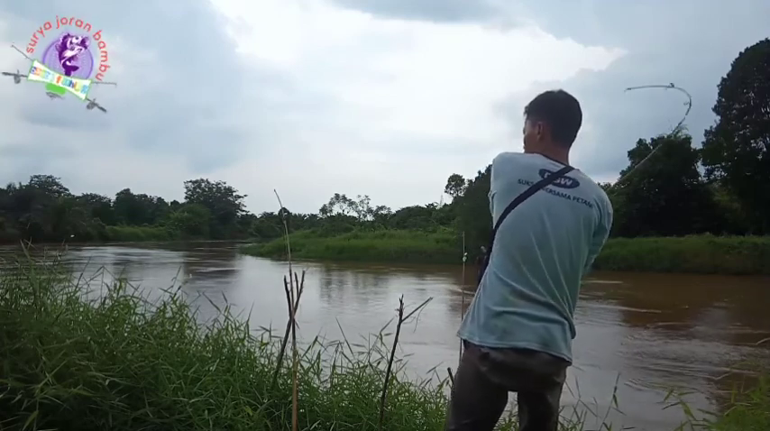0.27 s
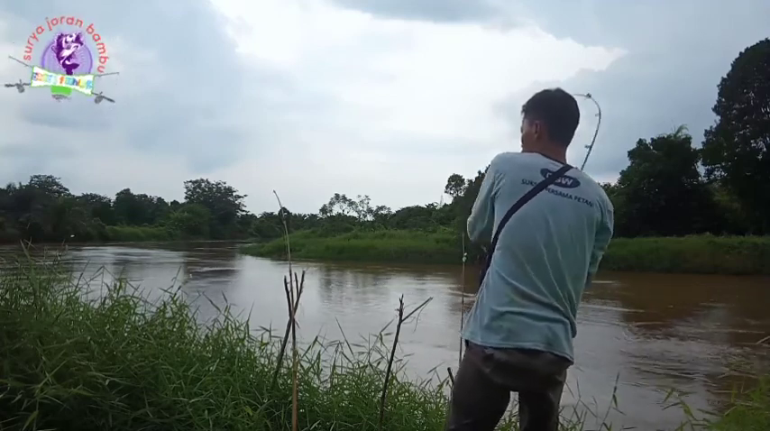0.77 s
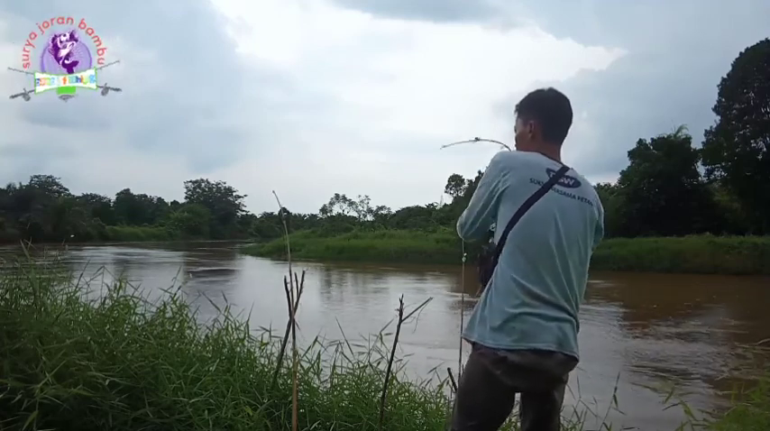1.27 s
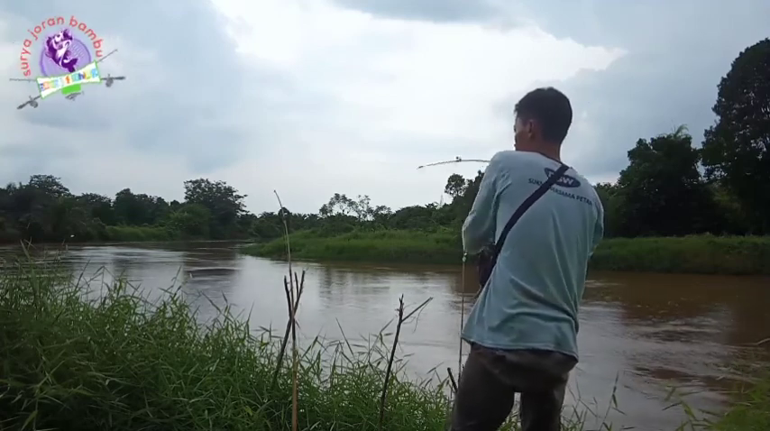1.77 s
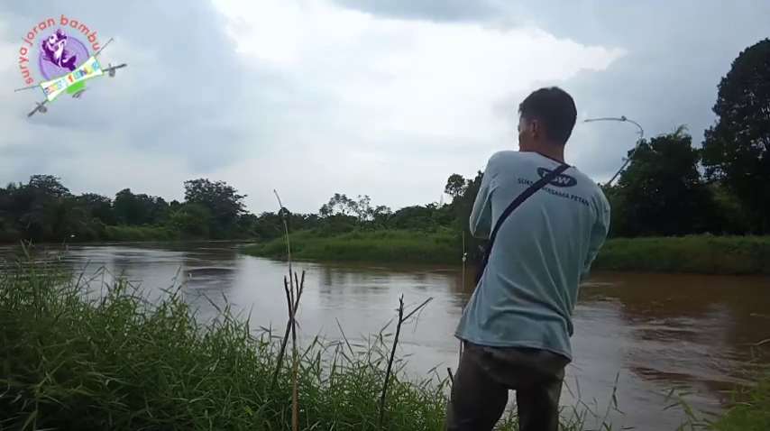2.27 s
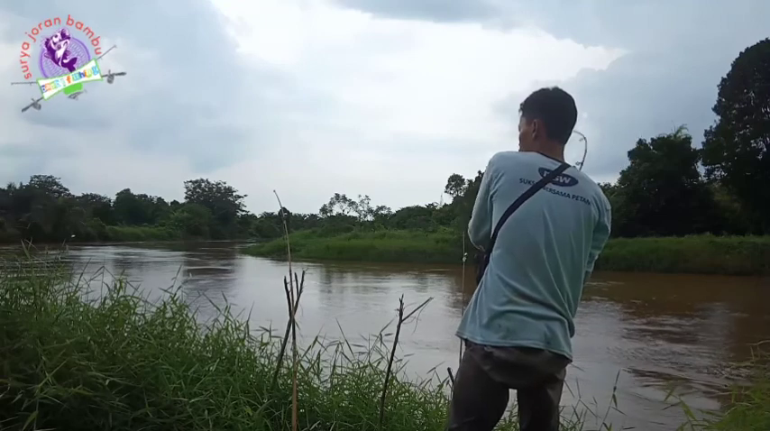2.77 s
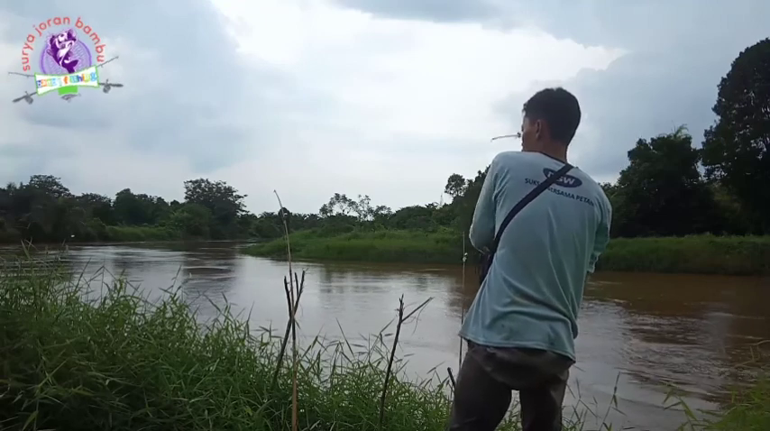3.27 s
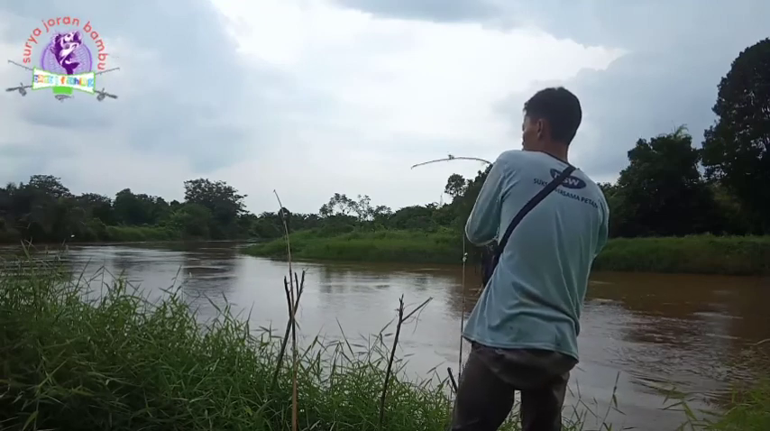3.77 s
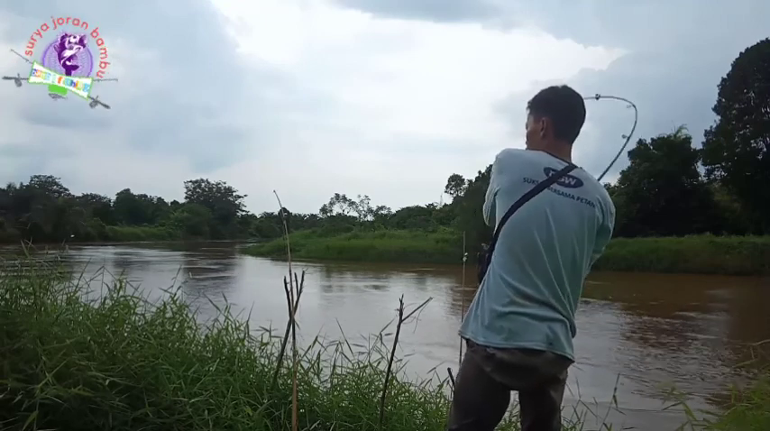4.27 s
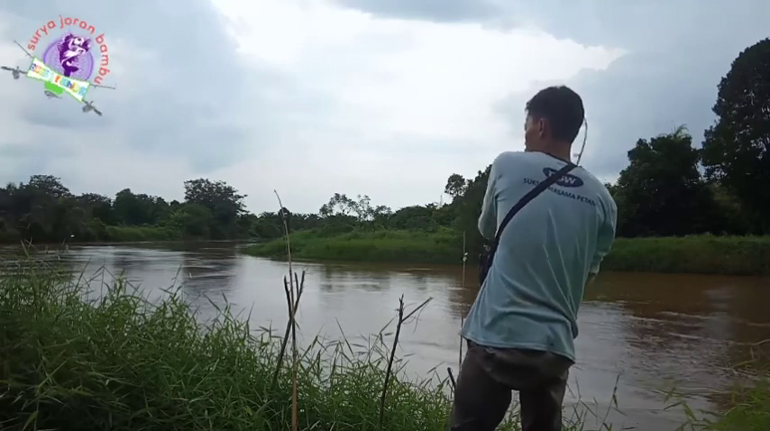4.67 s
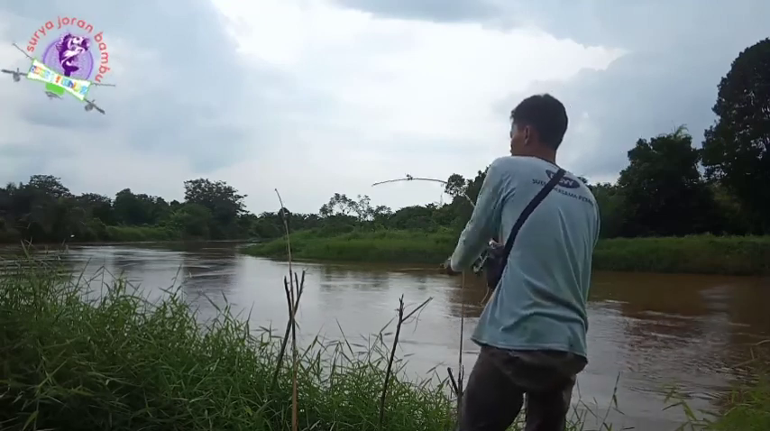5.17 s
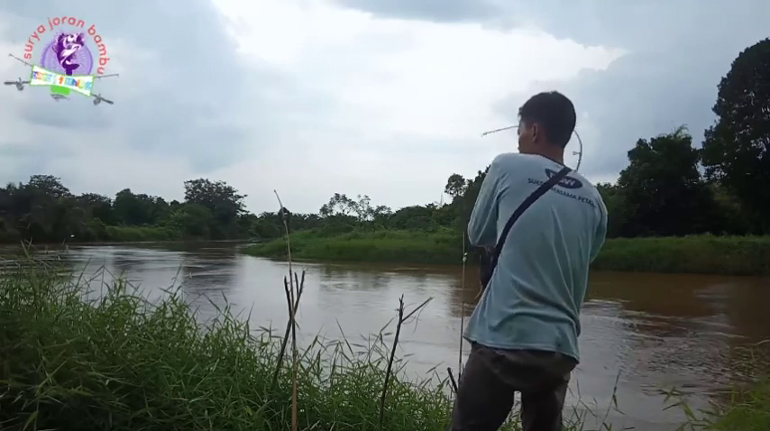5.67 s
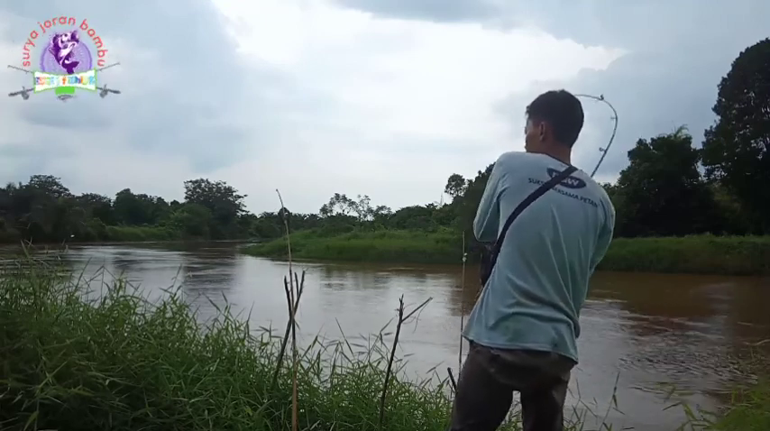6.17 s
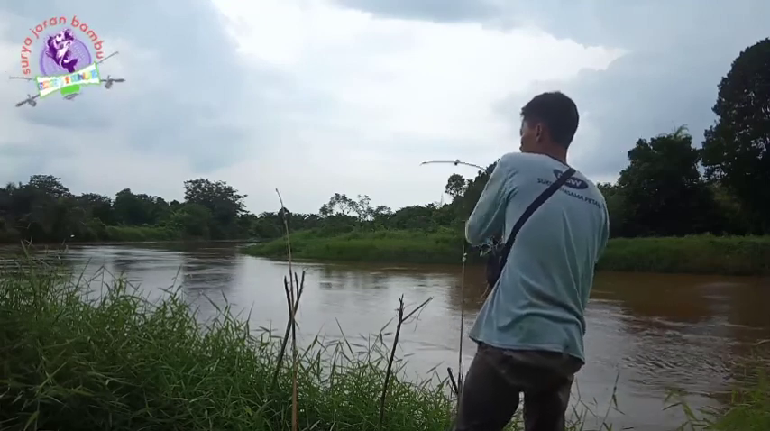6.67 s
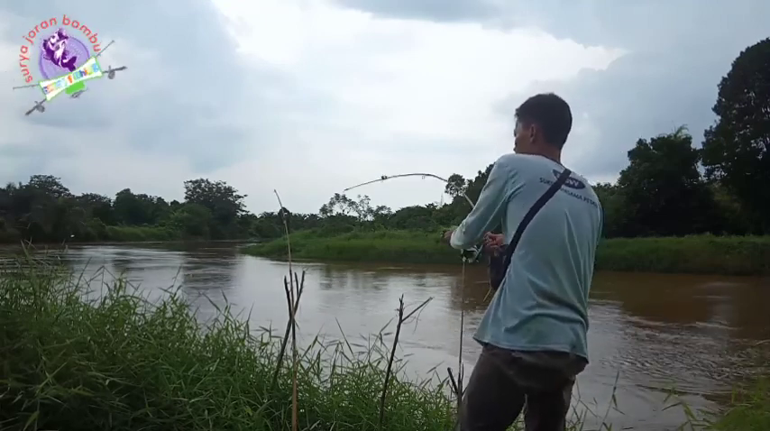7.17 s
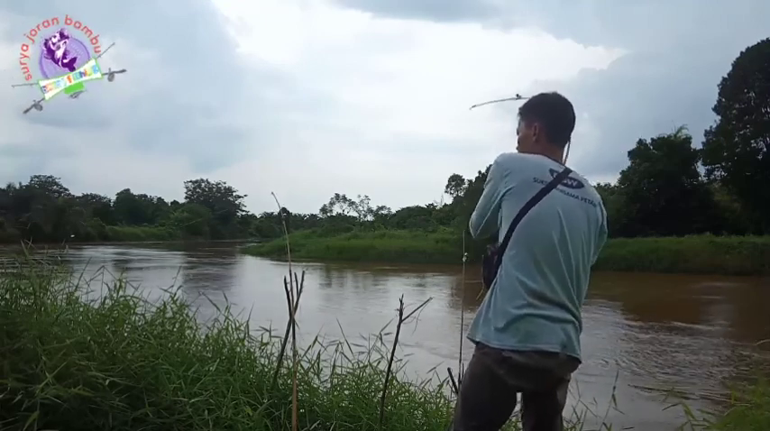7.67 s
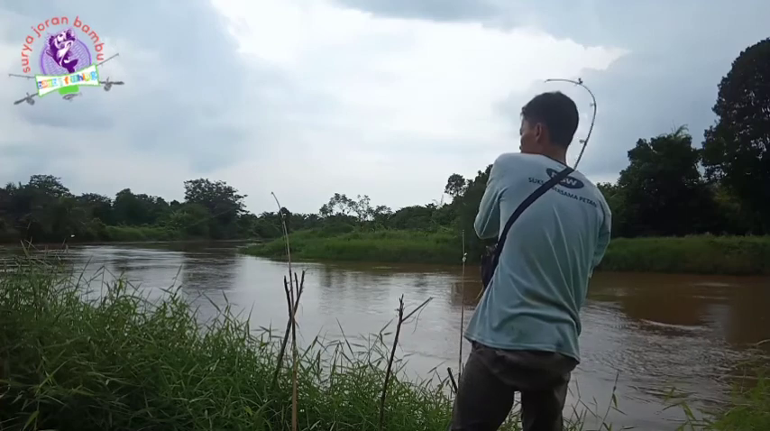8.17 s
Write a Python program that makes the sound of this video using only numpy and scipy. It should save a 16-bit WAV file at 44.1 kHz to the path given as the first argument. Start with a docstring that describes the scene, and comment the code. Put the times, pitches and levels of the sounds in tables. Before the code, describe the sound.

Two small bells on a fishing rod rattle with sharp ticks and short, bright rings. A reel is cranked in repeated bursts, its gears whirring softly and knocking, and each burst shakes the bells harder. In the pauses they jingle more lightly. Outdoors behind this nearby rattling, a river murmurs quietly under a thin high hiss, and three faint whistles pass, perhaps from a bird.

```python
"""Two small pellet bells rattle on a fishing rod: sharp ticks and a short, bright ring.
Each impact of a pellet excites the damped modes of its shell. The angler pumps the rod and cranks
the reel in bursts, shaking the bells; the gears whirr and the rotor knocks the resonant frame.
Behind them the river murmurs under a thin high hiss, the taut line sings faintly,
and three faint arched whistles pass, perhaps a bird."""
import sys
import numpy as np
from scipy import signal
from scipy.fft import rfft, irfft, next_fast_len
from scipy.io import wavfile

SR = 44100
rng = np.random.default_rng(int(sys.argv[2]) if len(sys.argv) > 2 else 0)


def wav_out(sig):
    """Save sig, one row per channel (or a flat mono array), as 16-bit PCM at SR to the path in sys.argv[1]."""
    wavfile.write(sys.argv[1], SR, np.round(np.clip(np.atleast_2d(sig).T, -1, 1) * 32767).astype(np.int16))


N = 370440
TIME_S = np.arange(N) / SR


def amp(db):
    """Amplitude ratio of a level in decibels."""
    return 10 ** (np.asarray(db) / 20)

def spectral_gain(spectrum, hz):
    """Spectral envelope: levels interpolated on a logarithmic frequency axis."""
    corner_hz, db = np.transpose(spectrum)
    return amp(np.interp(np.log(hz + 1), np.log(corner_hz), db))

def wobble(rate_hz):
    """Random modulation: straight lines between Gaussian values."""
    knots = rng.standard_normal(int(N * rate_hz / SR) + 2)
    return np.interp(TIME_S * rate_hz, np.arange(len(knots)), knots)

def filtered(x, response):
    """Linear filtering: the spectrum is multiplied by a frequency response."""
    size = next_fast_len(N + SR // 2)
    return irfft(rfft(x, size) * response(np.fft.rfftfreq(size, 1 / SR)), size)[..., :N]

def noise(spectrum):
    """Coloured noise: white noise under a spectral envelope, scaled to rms 1."""
    x = filtered(rng.standard_normal(N), lambda hz: spectral_gain(spectrum, hz))
    return x / np.sqrt(np.mean(x ** 2))

def resonate(x, modes):
    """Forced response of parallel second-order resonators of alternating polarity."""
    return filtered(x, lambda f: sum(
        (-1) ** k * amp(db) * 1j * f * width / (centre ** 2 - f ** 2 + 1j * f * width)
        for k, (centre, width, db) in enumerate(modes)))

def place(times, sounds):
    """Superposition of short sounds, one a row, at their start times."""
    at = np.round(times * SR).astype(int)[:, None] + np.arange(sounds.shape[1])
    return np.bincount(at.ravel(), sounds.ravel(), N)[:N]

def bursts(levels_db, t60_s, size=1024):
    """Decaying noise bursts, each with the energy of a single impulse of its level."""
    puff = rng.standard_normal((len(levels_db), size)) * amp(-60 * np.arange(size) / SR / t60_s)
    return puff * (amp(levels_db) / np.linalg.norm(puff, axis=1))[:, None]

def spells(rows, rise_s, fall_s):
    """Exponential build-up and decay of gain for rows of start_s, stop_s, level_db."""
    gain = np.zeros(N)
    for start, stop, db in rows:
        a, b = np.searchsorted(TIME_S, [start, stop + 8 * fall_s])
        t = TIME_S[a:b]
        gain[a:b] += amp(db) * (1 - np.exp((start - t) / rise_s)) * np.exp(np.minimum(stop - t, 0) / fall_s)
    return gain


# Spectra of the current and of the hiss: frequency_hz, relative_density_db
RIVER_SPECTRUM = [(15, -43), (25, -3), (119, 1), (166, 0.5), (251, -2), (285, -2.5), (323, -3.5), (726, -7),
                  (1380, -8.5), (1740, -10), (2800, -11), (3050, -5.5), (3600, -13.5), (4680, -36),
                  (7920, -120)]
HISS_SPECTRUM = [(2500, -26), (3600, -10.5), (5000, -12), (6900, 2), (8500, -9.5), (10000, -11),
                 (12000, -5), (13300, 5.5), (14500, -4.5), (15700, 5)]

def riverside():
    """Amplitude-modulated noise: the current murmurs under a flickering high hiss."""
    murmur = amp(-62 + 0.78 * wobble(3.114)) * noise(RIVER_SPECTRUM)
    hiss = amp(-49.5 + 2.5 * wobble(24)) * noise(HISS_SPECTRUM)
    return murmur + hiss

def wavering_tone(course, waver, flicker_db):
    """A sinusoid, randomly modulated in frequency and level, follows time_s, pitch_hz, level_db."""
    times, pitches, levels = np.transpose(course)
    gate = np.clip(np.minimum(TIME_S - times[0], times[-1] - TIME_S) / 0.0039, 0, 1)
    db = np.interp(TIME_S, times, levels) + flicker_db * wobble(120)
    hz = np.interp(TIME_S, times, pitches) * (1 + waver * wobble(250))
    return gate * amp(db) * np.sin(2 * np.pi * np.cumsum(hz) / SR)


# Tone of the fishing line: time_s, pitch_hz, level_db
LINE_COURSE = [(2.5, 933.4, -71), (2.8, 996, -67), (2.98, 1160, -68), (3.06, 990, -69.5), (3.2, 997, -71),
               (3.32, 948.8, -60), (3.42, 997, -69), (3.65, 950, -76)]

def taut_line():
    """A string under tension sings faintly with one unsteady partial."""
    return wavering_tone(LINE_COURSE, waver=0.041, flicker_db=4)


# Whistles: top_s, rise_s, fall_s, top_pitch_hz, climb_octaves, level_db
WHISTLE_ARCHES = [(1.427, 0.058, 0.057, 1810, 0.91, -48.5), (2.728, 0.062, 0.047, 1815, .45, -49.5),
                  (8.362, .095, .045, 1884, .8, -51.5)]

def whistles(drop_octaves=0.5, fade_db=8):
    """Frequency glides: each whistle is highest and loudest at the top of its arch."""
    position = np.linspace(-1, 1, 21)  # 0 at the top
    droop = 1 - np.cos(position * np.pi / 2)
    out = np.zeros(N)
    for top_s, rise_s, fall_s, hz, climb_octaves, db in WHISTLE_ARCHES:
        times = top_s + position * np.where(position < 0, rise_s, fall_s)
        octaves = droop * np.where(position < 0, climb_octaves, drop_octaves)
        course = np.c_[times, hz * 2 ** -octaves, db - fade_db * np.abs(position)]
        out += wavering_tone(course, waver=0.04, flicker_db=3)
    return out


# Spells of cranking: start_s, stop_s, whirr_db, shake_db
CRANK_SPELLS = [(0.549, 0.92, -57.5, -49), (0.922, 1.672, -58, -46), (1.707, 1.798, -63, -52),
                (2.362, 2.963, -60.5, -50.5), (3.005, 3.318, -62.5, -52), (3.461, 3.846, -61, -47),
                (4.553, 4.92, -61, -50.5), (4.927, 5.362, -59.5, -44.5), (6.178, 6.454, -65.5, -57),
                (6.463, 7.097, -58.5, -46), (8.219, 8.402, -64, -54.5)]
# Spectrum of the gears: frequency_hz, relative_density_db
GEAR_SPECTRUM = [(50, -5), (110, 2), (300, -3.5), (700, -7), (960, -4), (1150, -5.5), (1400, -5.5),
                 (1600, -3.5), (1830, 1.5), (2150, -4.5), (2800, -0.5), (4000, -2.5), (8000, -3.5)]

def gear_whirr(idle_db=-72):
    """Gear noise swells as the handle speeds up and decays as it coasts."""
    drive = spells(np.array(CRANK_SPELLS)[:, :3], rise_s=0.027, fall_s=0.04) + amp(idle_db)
    return drive * amp(5.5 + 2.8 * wobble(130)) * noise(GEAR_SPECTRUM)


# Knocks of the rotor, in relative levels: start_s, frame_db, body_db
ROTOR_KNOCKS = [(0.7656, -33.5, -48.5), (0.853, -34, -49.5), (1.107, -43, -63), (1.2885, -34.5, -59),
                (1.3794, -35, -57), (1.47, -34, -54.5), (1.5743, -38.5, -54.5), (1.7691, -38.5, -54.5),
                (2.3743, -32, -52.5), (2.495, -40, -68), (2.6634, -38, -57), (3.032, -42, -58.5),
                (3.4417, -35.5, -56), (3.535, -32, -52), (3.6237, -37, -62.5), (3.694, -39.5, -66.5),
                (3.81, -38, -60.5), (4.5524, -38.5, -51.5), (4.8334, -36.5, -54.5), (4.9327, -38, -53.5),
                (5.086, -29, -55.5), (5.1526, -34.5, -59.5), (5.229, -27.5, -56), (5.3238, -40, -70),
                (6.4619, -40, -61.5), (6.543, -35.5, -61), (6.746, -35, -71), (6.9174, -34.5, -60),
                (7.033, -35, -60)]
# Resonances of the reel: centre_hz, bandwidth_hz, gain_db
FRAME_MODES = [(2320, 59, -0.5), (3120, 100, 4.5), (3560, 200, -5), (3930, 300, -7)]
BODY_MODES = [(948.7, 19.7, -6.5), (1352, 20.6, 3.5), (1894, 65.4, -7)]

def rotor_knocks():
    """Impact excitation: play in the rotor knocks the frame and body into resonance."""
    times, frame_db, body_db = np.transpose(ROTOR_KNOCKS)
    frame = resonate(place(times, bursts(frame_db + 31, t60_s=0.047)), FRAME_MODES)
    body = resonate(place(times, bursts(body_db + 50, t60_s=0.053)), BODY_MODES)
    return frame + body


# Swaying of the rod: start_s, stop_s, shake_db
ROD_SWAYS = [(0, 0.2, -52), (0.33, 0.4, -53.5), (0.51, 0.6, -57.5), (1.8, 1.98, -54), (2.07, 2.27, -57),
             (2.72, 2.94, -49), (3.3, 3.45, -53), (3.87, 4.42, -56.5), (5.46, 5.75, -56),
             (7.1, 7.42, -55.5), (7.49, 8.02, -55)]

def shaking_db(strikes, jolt_decay_s=0.012, rest_db=-69.5):
    """Energy addition: cranking and swaying drive the pellets; strikes and knocks stir them briefly."""
    motions = np.vstack([np.array(CRANK_SPELLS)[:, [0, 1, 3]], ROD_SWAYS])
    driven = spells(motions, rise_s=0.0079, fall_s=0.025)
    knocks = np.array(ROTOR_KNOCKS)
    jolt_db = np.r_[strikes[:, 1] - 25, knocks[:, 1] - 8.5]
    jolt_energy = place(np.r_[strikes[:, 0], knocks[:, 0]], amp(jolt_db)[:, None] ** 2)
    stirred = signal.lfilter([1], [1, -np.exp(-1 / (jolt_decay_s * SR))], jolt_energy)
    return 10 * np.log10(driven ** 2 + stirred + amp(rest_db) ** 2)

def clatter(strikes, reference_db=-42, reference_rate_hz=290, chances=4000):
    """A random point process: harder shaking makes loose pellets hit more often and harder."""
    moment, luck, force = rng.random((chances, 3)).T
    at = ((np.arange(chances) + moment) * N / chances).astype(int)
    clump_db = 2 * wobble(35)  # the pellets move in clumps
    effort_db = (shaking_db(strikes) + clump_db)[at] - reference_db
    tick_db = -28 + effort_db + 5 * (2 * force - 1)
    ring_db = 0.59 * effort_db
    lean_db = 3 * wobble(25)[at]  # favours now one bell, now the other
    hits = np.c_[at / SR, tick_db, -48 + ring_db + lean_db, -46.5 + ring_db - lean_db]
    rate_hz = reference_rate_hz * amp(0.55 * effort_db)
    return hits[luck < rate_hz * N / SR / chances]

def bounces(strikes, gap_s=0.005, loss_db=3, dull_db=4, count=3):
    """Inelastic rebound: a pellet hops on after a strike, losing energy and raising less ring."""
    delay = np.cumsum(gap_s * rng.uniform(0.3, 1.7, (len(strikes), count)), axis=1)
    drop = loss_db * np.arange(1, count + 1) + rng.normal(0, 1.7, delay.shape)
    ring_drop = drop + dull_db
    return np.vstack([strikes + np.c_[delay[:, k], -drop[:, k], -ring_drop[:, k], -ring_drop[:, k]]
                      for k in range(count)])


# Spectrum of a skidding pellet: frequency_hz, gain_db
SKID_SPECTRUM = [(1000, -36), (3400, -86), (4300, 11), (5200, 5), (6000, 7.5), (7200, -3), (8300, -13),
                 (9600, -28), (11500, -4), (15500, -15)]

def pellet_ticks(times, tick_db, snap_hz=6330, snap_width_s=0.00009):
    """Contact transients: a brief snap at its own pitch, then noise as the pellet skids."""
    t = np.arange(-32, 96) / SR
    hz = snap_hz * np.exp(0.052 * rng.standard_normal((len(times), 1)))
    snaps = amp(tick_db[:, None] - 4) * np.cos(2 * np.pi * hz * t) / np.cosh(t / snap_width_s)
    skid_db = tick_db + 9 + 0.092 * np.minimum(tick_db + 34, 0)  # light taps skid less
    skids = place(times, bursts(skid_db, t60_s=0.043))
    return place(times, snaps) + filtered(skids, lambda f: spectral_gain(SKID_SPECTRUM, f))

def shell_ring(times, levels_db, modes, upper_db, upper_growth, scatter_db, flutter_db):
    """Modal superposition: each blow rings damped modes, which the rolling pellet makes flutter."""
    t = np.arange(SR // 5) / SR
    attack = 1 - np.exp(-t / 0.0003)
    overtone_db = upper_db + upper_growth * (levels_db + 40.5)  # grows more slowly than the blow
    out = np.zeros(N)
    for k, (hz, db, t60_s) in enumerate(modes):
        blow_db = levels_db
        if k > 0:
            blow_db = overtone_db + scatter_db * rng.standard_normal(len(times)).clip(-2, 1.5)
        blows = place(times, amp(blow_db + db)[:, None])
        impulse_response = attack * amp(-60 * t / t60_s) * np.sin(2 * np.pi * hz * t)
        flutter = amp(flutter_db * hz / modes[0][0] * wobble(70).clip(-1.5, 1))
        out += signal.oaconvolve(blows, impulse_response)[:N] * flutter
    return out


# Hard pellet strikes, in relative levels: start_s, tick_db, low_bell_db, high_bell_db
PELLET_STRIKES = [(0.0724, -24, -38.5, -47), (0.1119, -38.5, -35, -52), (0.192, -22.5, -36.5, -45),
                  (0.5115, -22, -50, -37), (0.5777, -36, -52, -50.5), (0.6588, -22.5, -36.5, -38),
                  (0.7641, -22.5, -32.5, -40), (0.8096, -22, -38, -44), (0.841, -18, -31.5, -31.5),
                  (0.9688, -27, -37, -35), (1.0311, -26, -48, -33), (1.188, -20.5, -39, -38),
                  (1.277, -23.5, -48, -33.5), (1.292, -22, -43, -44.5), (1.3613, -20, -36, -36),
                  (1.4722, -23, -30.5, -46), (1.572, -19, -47, -45), (1.6203, -37, -32, -43),
                  (1.663, -22, -52, -50), (1.875, -36.5, -54.5, -49), (2.1, -30.5, -57.5, -57),
                  (2.156, -32.5, -55, -63), (2.206, -27, -57.5, -45), (2.3754, -19.5, -28, -53),
                  (2.4267, -25.5, -32.5, -53), (2.5554, -24, -54, -52), (2.628, -29, -37, -46),
                  (2.7604, -29, -36, -44), (2.903, -39.5, -51.5, -51), (3.041, -24, -31, -45),
                  (3.1313, -24.5, -34, -43.5), (3.242, -30, -35.5, -56.5), (3.4425, -26, -56, -48),
                  (3.5336, -20, -35.5, -37), (3.5804, -23, -38, -46), (3.6164, -18.5, -32, -37.5),
                  (3.6513, -23, -41, -40), (3.686, -16.5, -46.5, -29), (3.742, -25, -53.5, -32.5),
                  (4.08, -46, -43, -54), (4.2557, -35.5, -53, -62), (4.398, -49, -61.5, -51),
                  (4.5136, -23.5, -38, -47), (4.5528, -15.5, -27, -40), (4.582, -21, -41, -30),
                  (4.598, -22.5, -40, -36), (4.6913, -26.5, -53, -37.5), (4.834, -18, -39, -35),
                  (4.929, -16.5, -47, -42), (5.0199, -20.5, -39, -32), (5.0597, -17, -36, -36),
                  (5.128, -21.5, -49, -30.5), (5.184, -24.5, -51, -35), (5.229, -18, -31, -48),
                  (5.2515, -36, -45, -32), (5.3185, -19, -47, -44.5), (5.358, -30, -47, -51),
                  (5.453, -31, -43, -42.5), (5.471, -37, -54, -34.5), (5.671, -28, -37, -54),
                  (5.8264, -46, -46, -62), (5.953, -42, -58, -44.5), (6.0457, -45, -70, -48),
                  (6.192, -37, -52, -62.5), (6.2987, -31, -55, -39), (6.376, -29, -52, -42),
                  (6.4599, -28, -47, -31.5), (6.5378, -23, -49, -46), (6.6256, -25.5, -50, -44),
                  (6.6748, -35, -51.5, -38), (6.8253, -23.5, -51, -42), (6.9173, -17.5, -47, -48),
                  (7.08, -24, -55, -47), (7.2248, -44.5, -63, -40.5), (7.3405, -35.5, -45, -47),
                  (7.639, -31, -48.5, -38), (7.6939, -23.5, -34.5, -35), (7.8071, -34, -43, -48),
                  (7.8678, -31, -41, -47.5), (8.0287, -43, -44.5, -56), (8.2516, -32, -58, -47.5)]
# Modes of the two shells: pitch_hz, relative_level_db, t60_s
LOW_MODES = [(4362, 0, .12), (5187, -10.5, .11), (11247, -5, .055), (12198, -6, .055), (13515, -20, .06),
             (14241, -22, .07), (15540, -20, .07)]
HIGH_MODES = [(4628, 0, .115), (5280, -18, .1), (11417, -6, .055), (12666, -5.5, .05), (14453, -22, .07),
              (15652, -20, .07)]

def pellet_bells():
    """Impact excitation: strikes, rebounds and loose clatter all sound the same two shells."""
    strikes = np.array(PELLET_STRIKES)
    loose = clatter(strikes)
    times, tick_db, low_db, high_db = np.vstack([strikes, bounces(strikes), loose]).T
    low = shell_ring(times, low_db, LOW_MODES,
                     upper_db=-41.5, upper_growth=0.66, scatter_db=3.5, flutter_db=2)
    high = shell_ring(times, high_db, HIGH_MODES,
                      upper_db=-42, upper_growth=0.8, scatter_db=4, flutter_db=3)
    return amp(-1.06) * (low + high) + pellet_ticks(times, tick_db)

def scene():
    """Linear superposition of all sources, the same in both channels."""
    mono = whistles() + pellet_bells() + rotor_knocks() + gear_whirr() + riverside() + taut_line()
    return np.array([mono, mono])

def record(dry, bass_hz=52, top_hz=15830):
    """Band limiting: a high-pass thins the deep bass and a sharp cutoff removes the highest treble."""
    return filtered(dry, lambda hz: (hz < top_hz) * hz ** 2 / np.hypot(hz ** 2, bass_hz ** 2))


dry = scene()
out = record(dry)
wav_out(out)
```